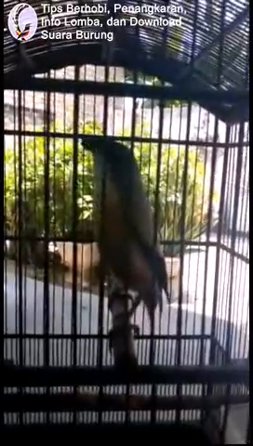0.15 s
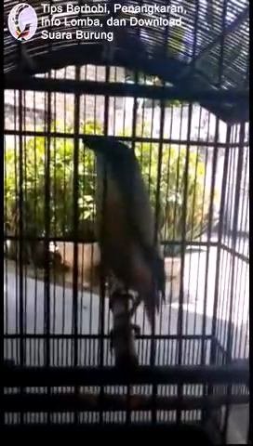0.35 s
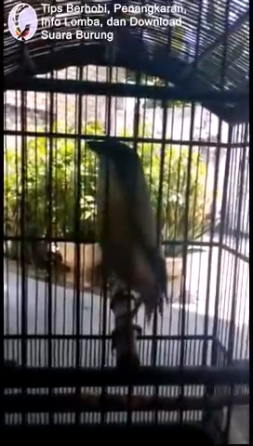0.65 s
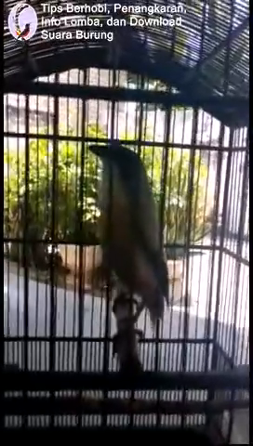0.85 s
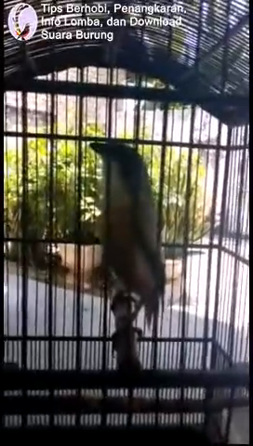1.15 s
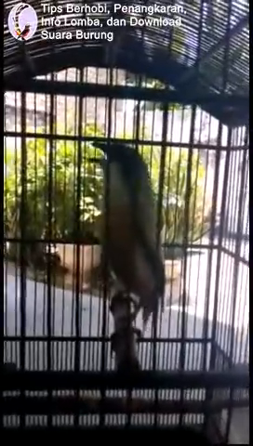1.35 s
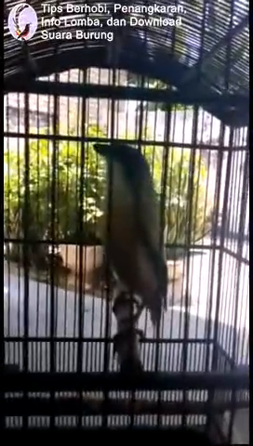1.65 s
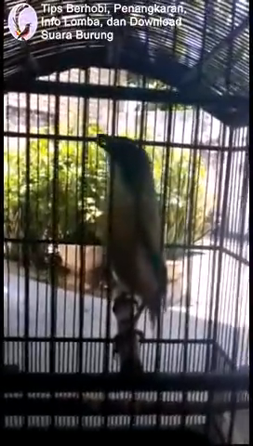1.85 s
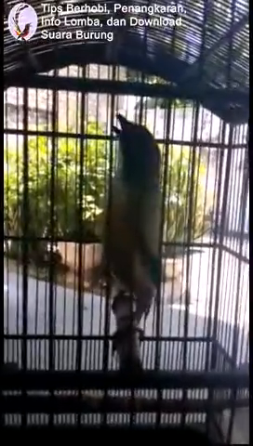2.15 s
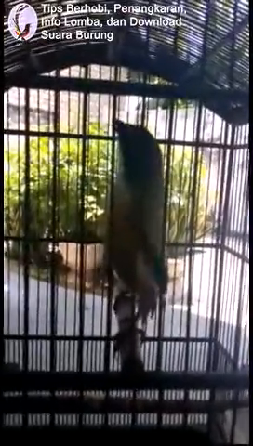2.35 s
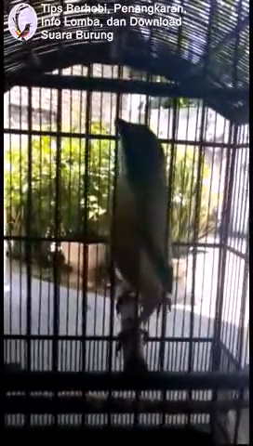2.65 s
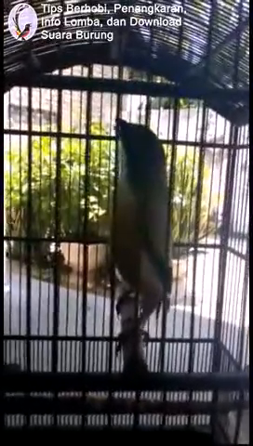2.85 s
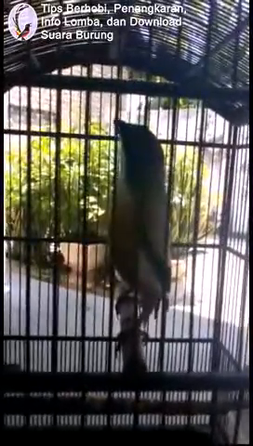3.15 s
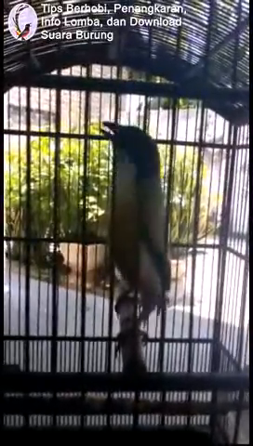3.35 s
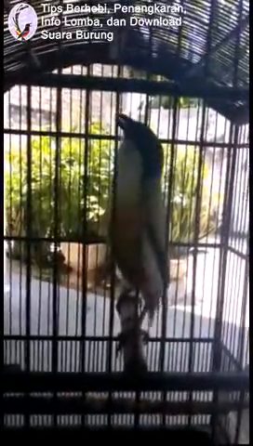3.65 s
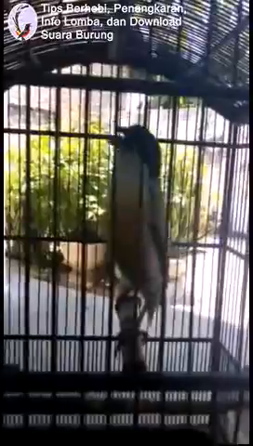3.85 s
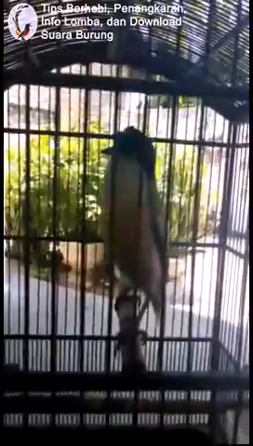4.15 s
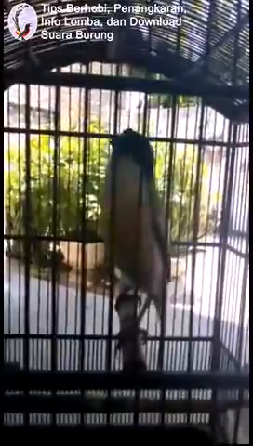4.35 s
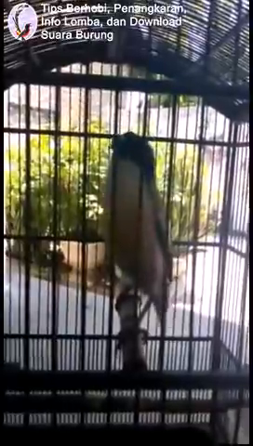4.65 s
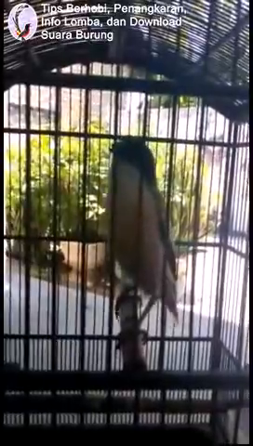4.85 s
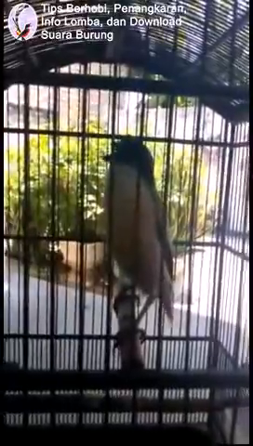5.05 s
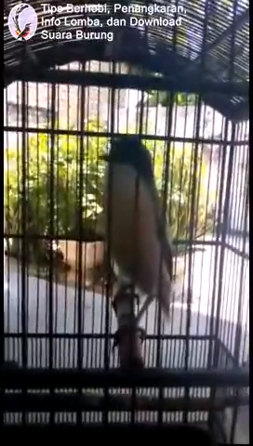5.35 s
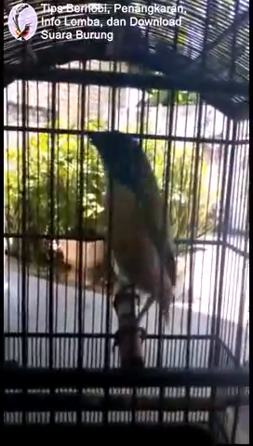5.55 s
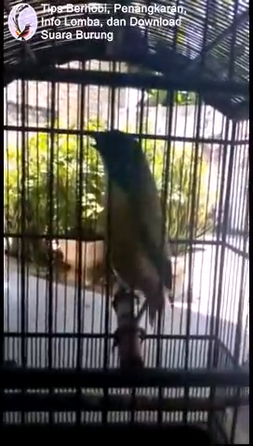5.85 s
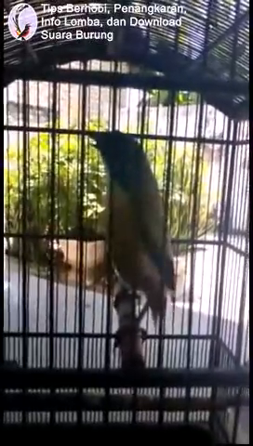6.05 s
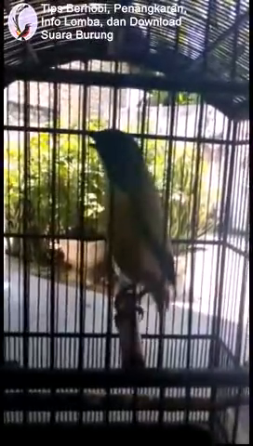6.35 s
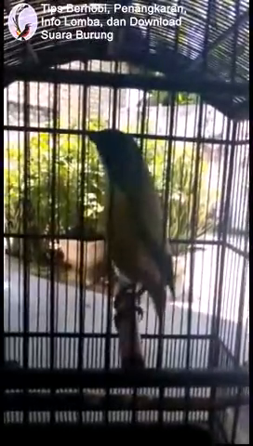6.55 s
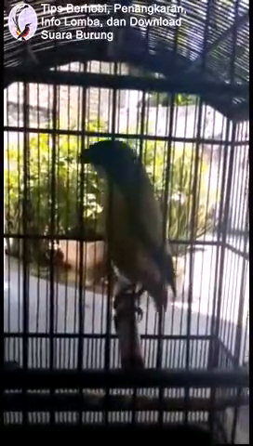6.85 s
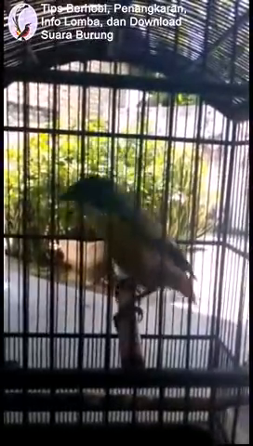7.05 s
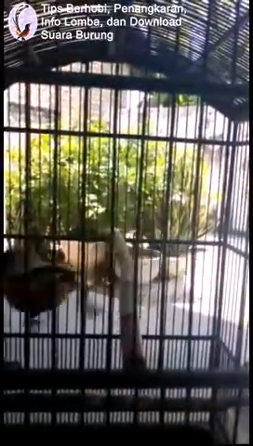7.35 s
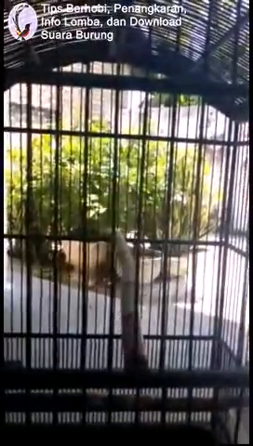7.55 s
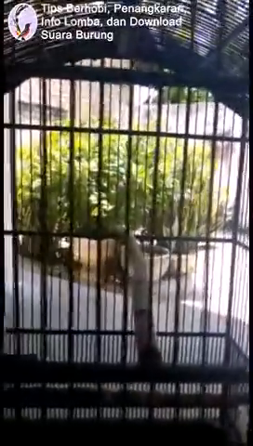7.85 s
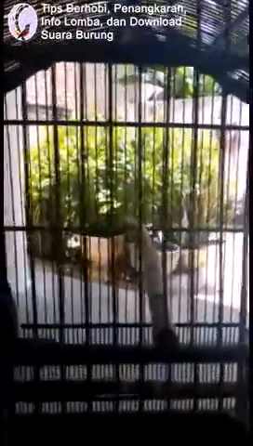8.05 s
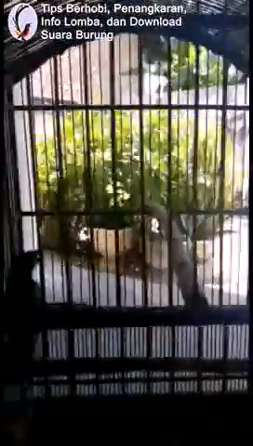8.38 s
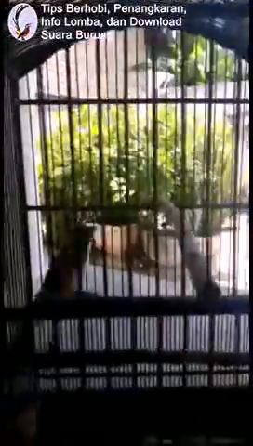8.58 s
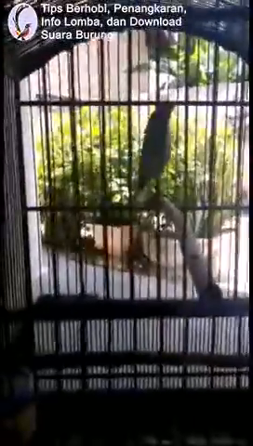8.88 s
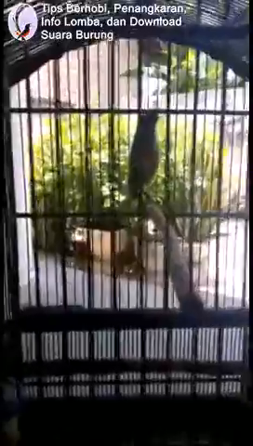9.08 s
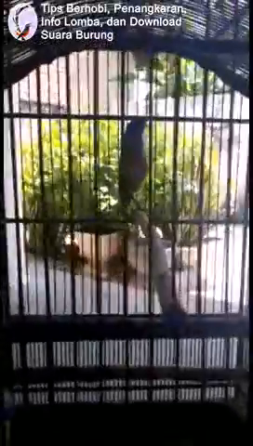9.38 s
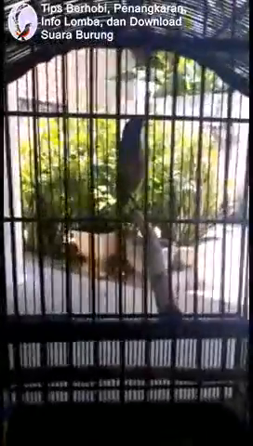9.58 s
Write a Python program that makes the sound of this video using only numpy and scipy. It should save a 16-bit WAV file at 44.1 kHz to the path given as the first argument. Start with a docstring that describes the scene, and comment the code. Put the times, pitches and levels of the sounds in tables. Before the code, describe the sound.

A single caged bird sings close to the microphone on a porch. Four snappy tuks, three spaced rising mews, an accelerating-in-loudness run of tiny ticks, seven more tuks, then loud piercing chips in steady rhythm. A squeak leads into many quick upslurred wheeps that grow rougher; after a short pause comes a five-note nasal chatter. Short cage and wall echoes, very faint outdoor air and distant engines.

```python
"""Over faint outdoor noise and a brief falling tone, a shrike sings close by in a cage on a porch: sharp tuks,
then rising mews, a run of ticks, more tuks, piercing chips, a squeak, upslurred wheeps and at last a chatter.
Each syllable is one gesture of the voice organ (syrinx): a gliding tone with harmonics, roughened by noise
and filtered by throat and beak. Notes of a kind differ a little; cage and walls answer with short echoes.
Outside there are filtered noise for air and far engines, a hum of steady tones, and soft gliding tones."""
import sys
import numpy as np
from scipy import signal
from scipy.fft import rfft, irfft, next_fast_len
from scipy.io import wavfile
from scipy.ndimage import uniform_filter1d, map_coordinates

SR = 44100
rng = np.random.default_rng(int(sys.argv[2]) if len(sys.argv) > 2 else 0)


def wav_out(sig):
    """Save sig, one row per channel (or a flat mono array), as 16-bit PCM at SR to the path in sys.argv[1]."""
    wavfile.write(sys.argv[1], SR, np.round(np.clip(np.atleast_2d(sig).T, -1, 1) * 32767).astype(np.int16))


N = 428652

# throat and beak filter of several kinds of note; wheeps shift it: (frequency [Hz], gain [dB])
WIDE_BEAK = [(900, -32), (2100, -13.5), (2600, -17), (4300, -1), (5300, -4), (6200, -1.5), (7100, -14),
             (8200, -26.5), (10500, -24.5), (13300, -32.5), (15500, -45)]


def from_db(db):
    """Turn decibels into a gain."""
    return 10 ** (np.asarray(db) / 20)


def rms_one(x):
    """Scale to unit power."""
    return x / np.sqrt(np.mean(x ** 2) + 1e-20)


def at_hz(points, hz):
    """Read a curve of (frequency, value) points on a log-frequency axis."""
    f, value = np.transpose(points)
    return np.interp(np.log(np.maximum(hz, 1)), np.log(f), value)


def along(rows, where):
    """Read every column of a table at the wanted places of its first column."""
    key, *columns = np.transpose(rows)
    return [np.interp(where, key, c) for c in columns]


def through(x, spectrum):
    """Filter a sound by a spectrum of gains in dB."""
    size = 2 * next_fast_len(len(x))
    gain = from_db(at_hz(spectrum, np.fft.rfftfreq(size, 1 / SR)))
    return irfft(rfft(x, size) * gain, size)[:len(x)]


def coloured(spectrum, size):
    """Noise of unit power with the given spectrum."""
    return rms_one(through(rng.standard_normal(size), spectrum))


def wobble(hz, size):
    """Random motion, mostly slower than hz, of about unit power."""
    lowpass = signal.butter(2, hz, fs=SR, output="sos")
    motion = rms_one(signal.sosfilt(lowpass, rng.standard_normal(2 * size)))
    return motion[size:]  # skip the filter's start


def shares(length):
    """Progress through a note of the given length in seconds, from 0 to 1."""
    return np.linspace(0, 1, int(length * SR))


def bump(u, at, width):
    """A passing movement: 1 at its middle, 0 far from it."""
    return np.exp(-((u - at) / width) ** 2)


def switch(u, at, width):
    """A lasting movement from 0 to 1."""
    return .5 + .5 * np.tanh((u - at) / width)


def glide(first, last, share):
    """Go from one value to another."""
    return first + (last - first) * share


def swell(u, rise_db, full_at, release_share, fall_db):
    """Attack, hold and release of a note, in dB; a negative fall makes the end grow."""
    attack = rise_db * np.maximum(1 - u / full_at, 0)
    release = fall_db * np.maximum(1 - (1 - u) / release_share, 0)
    return -attack - release


def stereo_noise(spectrum, side_db):
    """Noise shared by both ears, plus a part that is opposite in the two."""
    shared = coloured(spectrum, N)
    return shared + from_db(side_db) * coloured(spectrum, N) * np.array([[1], [-1]])


def outdoor_air(air_db=-66):
    """Outdoor air: a steady, wide noise."""
    # colour of the air noise: (frequency [Hz], relative level [dB per Hz])
    air_colour = [(25, -10), (150, 1.5), (420, -7), (750, -5), (1200, -14.5), (15000, -28.5)]
    return from_db(air_db) * stereo_noise(air_colour, side_db=-1.5)


def engine_drone(t):
    """Far engines: low noise with a peak near 150 Hz that swells and sinks."""
    # level of the drone: (time [s], level [dB])
    drone_levels = [(0, -59), (2.2, -64.5), (3.8, -71.5), (4.7, -70.5), (5.05, -55), (5.7, -64),
                    (6.15, -54.5), (6.7, -68), (7.5, -54.5), (8.7, -72.5)]
    level_db, = along(drone_levels, t)
    spectrum = [(50, -20.5), (125, -8), (153, 8), (195, -6), (1200, -45.5)]
    return from_db(level_db) * stereo_noise(spectrum, side_db=-18.0)


def engine_murmur(t, murmur_db=-1):
    """The murmur above the drone: noise strongest near 220 Hz, with a changing level."""
    # level of the murmur, before murmur_db is added: (time [s], level [dB])
    murmur_levels = [(0.0, -62.5), (2.38, -58), (2.68, -63), (8.25, -72.5), (9.72, -80)]
    level_db, = along(murmur_levels, t)
    spectrum = [(100, -19), (220, 0), (340, -4), (500, -14), (2000, -31), (8000, -53)]
    return from_db(murmur_db + level_db) * stereo_noise(spectrum, side_db=-10)


def faint_hum(hum_waver=.004):
    """A faint hum: sine tones of constant level whose pitch wavers slightly."""
    # tones of the hum: (average frequency [Hz], level [dB])
    hum_tones = [(384, -69), (671, -75.5), (720, -76)]
    out = 0
    for hz, db in hum_tones:
        phase = 2 * np.pi * hz * np.cumsum(1 + hum_waver * wobble(12, N)) / SR
        out = out + from_db(db) * np.sqrt(2) * np.sin(phase)
    return out


def soft_tones(t, overtone_db=-5, waver=0.042):
    """Soft tones with one overtone: a brief falling one at the start, then faint, wavering far calls."""
    # one row per tone, the level being the peak of its fundamental:
    # (time [s], length [s], first pitch [Hz], last pitch [Hz], level [dB])
    tones = [(0, 0.07, 1190, 1014, -49.5), (0.552, 1.25, 997, 883, -64.5), (1.46, 1.17, 1167, 1034, -73),
             (2.28, 0.19, 1003, 990, -63), (7.45, .7, 1062, 1333, -60), (7.98, .45, 584, 586, -65.5),
             (8.74, 0.22, 1262, 1310, -68)]
    out = 0
    for s, length, first_hz, last_hz, level_db in tones:
        share = np.clip((t - s) / length, 0, 1)
        pitch = glide(first_hz, last_hz, share) * (1 + waver * wobble(60, N))
        phase = 2 * np.pi * np.cumsum(pitch) / SR
        arch = 4 * share * (1 - share)
        out = out + from_db(level_db) * arch * (np.sin(phase) + from_db(overtone_db) * np.sin(2 * phase))
    return out


def neighbourhood(t):
    """Everything in the background, added up: air, far engines, hum and soft tones."""
    return outdoor_air() + engine_drone(t) + engine_murmur(t) + faint_hum() + soft_tones(t)


def syllable(beak, note_db, pitch, level_db, odd_db, rasp, hiss_db, halves=0, jitter=0.1, flutter=0.12,
             waver=0.0064, balance_db=3, air_db=-29):
    """One note: the harmonics of the syrinx glide through the resonances of throat and beak."""
    size = len(pitch)
    pitch = pitch * (1 + waver * wobble(110, size))
    odd_db = odd_db + balance_db * wobble(90, size)  # no two notes have quite the same colour
    # in rasping stretches the membranes vibrate unevenly
    uneven = 1 + jitter * (rasp + 0.041) * wobble(630, size)
    phase = 2 * np.pi * np.cumsum(pitch * uneven) / SR
    k = np.arange(1, 23)[:, None] / 2
    # odd harmonics follow odd_db; period doubling puts lines halfway between the harmonics
    strength = np.where(k % 1 > 0, halves, np.where(k % 2 == 1, from_db(odd_db), 1))
    strength = strength * (k * pitch < SR * .4)  # leave out tones that are too high
    tone = through((strength * np.sin(k * phase)).sum(0), beak)
    tone = tone / np.sqrt(uniform_filter1d(tone ** 2, size=64) + 1e-12)  # even out the loudness
    # turbulence: part rings in the throat, part leaves the beak as bright air
    hiss = from_db(hiss_db) * rasp * coloured(beak, size)
    air_colour = [(2000, -32.5), (4000, 4.5), (13500, -3.5), (16000, -16)]
    air = from_db(air_db) * np.sqrt(np.abs(rasp)) * coloured(air_colour, size)
    voice = tone * (1 + flutter * rasp * wobble(330, size)) + hiss + air
    shaped = voice * from_db(level_db) * signal.windows.tukey(size, .06)
    return from_db(note_db) * rms_one(shaped)


def tuk(whistle_hz, note_db, length_s=.029, start_hz=3850, low_hz=2650, snap_at=.4, catch_db=10):
    """A downward scoop catches, rasps and snaps up to a clean, level whistle."""
    # throat and beak held narrow: (frequency [Hz], gain [dB])
    narrow_beak = [(1800, -48), (2700, -1), (3900, -4.5), (5300, -7.5), (6500, -16.5), (8000, -27.5),
                   (12500, -45.5), (15000, -60.5)]
    u = shares(length_s)
    catch = bump(u, at=0.33, width=0.13)
    scoop = glide(start_hz, low_hz, u / snap_at)
    pitch = glide(scoop, whistle_hz, switch(u, snap_at, width=0.056))
    level_db = swell(u, rise_db=19.5, full_at=.15, release_share=0.33, fall_db=13) - catch_db * catch
    rasp = glide(.08, 0.9, catch)
    return syllable(narrow_beak, note_db, pitch, level_db, odd_db=10, rasp=rasp, hiss_db=-4.0)


def mew(length, note_db, doubling, start_hz=1690, top_hz=2700, climb_share=.42, odd_db=7):
    """A long rise that flattens out, may split roughly in mid-note and frays at the end."""
    u = shares(length)
    pitch = glide(top_hz, start_hz, np.exp(-u / climb_share))
    level_db = swell(u, rise_db=11.5, full_at=0.63, release_share=0.44, fall_db=5.5)
    split = doubling * bump(u, at=0.41, width=0.25)
    rasp = glide(0.036, 0.5, switch(u, at=0.82, width=.08)) + .25 * split
    # odd harmonics come forward early and step back later
    balance = odd_db * (bump(u, at=0.22, width=0.057) - bump(u, at=0.6, width=0.22))
    return syllable(WIDE_BEAK, note_db, pitch, level_db, balance, rasp, hiss_db=-17, halves=split)


def tick(pitch_hz, note_db, length_s=.008, start_ratio=0.778, clean_hz=5700, rasp_span_hz=1700, odd_db=5):
    """A rough click that clears into a very short pip; the lower it is, the rougher it stays."""
    u = shares(length_s)
    clear = switch(u, at=.2, width=0.14)
    pitch = pitch_hz * glide(start_ratio, 0.99, clear)
    level_db = swell(u, rise_db=19.5, full_at=.33, release_share=0.24, fall_db=21)
    lasting_rasp = 0.051 + ((clean_hz - pitch_hz) / rasp_span_hz) ** 2
    rasp = glide(0.51, lasting_rasp, clear)
    return syllable(WIDE_BEAK, note_db, pitch, level_db, odd_db, rasp, hiss_db=-13.5, air_db=-26)


def chip(length, note_db, start_hz=3100, whistle_hz=2620, creep_hz=150, land_hz=3530, overshoot_hz=750,
         crack_db=-20, odd_db=-16):
    """The octave settles into a piercing, growing whistle, cracks upward and lands on a weaker tone."""
    # throat and beak in the chips: (frequency [Hz], gain [dB])
    chip_beak = [(1900, -51), (2700, -11.5), (4200, -3), (5300, 1), (6300, -7.5), (8000, -12.5),
                 (10700, -27.5), (13300, -19), (16000, -32.5)]
    u = shares(length)
    entry, crack = bump(u, at=0, width=0.23), switch(u, at=.785, width=0.033)
    whistle = glide(whistle_hz + creep_hz * u ** 2, start_hz, entry)
    pitch = glide(whistle, land_hz, crack) + overshoot_hz * bump(u, at=.84, width=0.044)
    level_db = swell(u, rise_db=16, full_at=0.54, release_share=0.051, fall_db=-6)
    level_db = level_db + (crack_db - note_db) * crack  # the crack is about equally loud in every chip
    rasp = 0.058 + 0.77 * bump(u, at=.84, width=.07)
    # even harmonics carry the whistle, an octave above the fundamental; odd ones lead at both ends
    balance = glide(glide(odd_db, 10, entry), 6, crack)
    return syllable(chip_beak, note_db, pitch, level_db, balance, rasp, hiss_db=-6, air_db=-14.5,
                    waver=.008, balance_db=6)


def squeak(length, note_db, start_hz=2220, top_hz=3500, bend=2.8, land_hz=2200):
    """A split, shrill note that curls upward and collapses in a rasp."""
    u = shares(length)
    collapse, split = switch(u, at=.85, width=0.065), bump(u, at=0.35, width=0.16)
    pitch = glide(glide(start_hz, top_hz, u ** bend), land_hz, collapse)
    level_db = swell(u, rise_db=13, full_at=0.24, release_share=0.26, fall_db=16)
    rasp = 0.065 + 0.31 * split + 1.3 * collapse
    return syllable(WIDE_BEAK, note_db, pitch, level_db, odd_db=-5, rasp=rasp, hiss_db=-6.5,
                    halves=0.49 * split, air_db=-22.5)


def wheep(length, shoulder_hz, note_db, held_back, crack, start_hz=1370, flick_hz=3150, shoulder_at=.66,
          crack_db=1, doubling=0.22, catch_db=8, least_gape=0.9, gape_gain=0.32):
    """A climb to a shoulder and a flick; held back, it swells sooner, gapes wider and catches up late."""
    u = shares(length)
    delay = held_back * (1 - switch(u, at=.67, width=0.0925))
    climb = np.minimum(u / shoulder_at, 1) * (1 - delay)
    flick, strain = switch(u, at=.87, width=0.033), bump(u, at=0.592, width=.11)
    pitch = glide(glide(start_hz, shoulder_hz, climb), flick_hz, flick)
    level_db = swell(u, rise_db=16.5, full_at=0.58 * (1 - held_back), release_share=0.19, fall_db=6.5)
    level_db = level_db - crack_db * crack * strain
    level_db = level_db - catch_db * bump(u, at=0.854, width=0.029)  # the voice catches at the jump to the flick
    # the third harmonic leads at first, the second on the shoulder;
    # in the flick the fundamental comes out unless the climb was held back
    odd_db = 11 * bump(u, at=0, width=0.16) - 10 * bump(u, at=0.74, width=0.12)
    odd_db = odd_db + (14 - 25 * held_back) * bump(u, at=0.99, width=0.11)
    rasp = 0.087 + glide(0.14, 0.87, crack) * strain + 0.34 * flick
    gape = least_gape + gape_gain * held_back
    beak = [(hz * gape, db) for hz, db in WIDE_BEAK]  # a wider gape raises the resonances
    return syllable(beak, note_db, pitch, level_db, odd_db, rasp, hiss_db=-6.5,
                    halves=doubling * crack * strain, waver=0.0099, balance_db=5.5, air_db=-17)


def chatter(length, top_hz, note_db, scoop=0.16, fall=0.344, odd_db=-7):
    """A nasal arch: the even harmonics ring on top; it is harsh where it rises and where it falls away."""
    # throat and beak in the chatter: (frequency [Hz], gain [dB])
    chatter_beak = [(1000, -28), (2300, -19.5), (3150, 0), (3800, -3), (4600, -7), (6500, -18.5),
                    (8000, -25), (15000, -32.5)]
    u = shares(length)
    entry, drop = bump(u, at=0, width=0.25), switch(u, at=.9, width=0.084)
    pitch = top_hz * (1 - scoop * entry - fall * drop)
    level_db = swell(u, rise_db=13.5, full_at=0.37, release_share=0.21, fall_db=3.5)
    balance = glide(odd_db, 6.5, entry + drop)
    rasp = 0.13 + .5 * entry + 0.82 * drop
    return syllable(chatter_beak, note_db, pitch, level_db, balance, rasp, hiss_db=-3, jitter=0.059)


def phrase(notes, voice):
    """Sing one kind of note at each row's time."""
    out = np.zeros(N + SR)
    for s, *row in notes:
        note, start = voice(*row), int(s * SR)
        out[start:start + len(note)] += note
    return out[:N]


def song():
    """The whole song as it leaves the beak, one phrase for each kind of note."""
    # tuks: (time [s], whistle pitch [Hz], level [dB])
    tuk_notes = [(0.036, 4027, -15.5), (0.138, 3993, -16), (0.262, 4080, -16.5), (0.374, 4065, -16.5),
                 (2.591, 4120, -15.5), (2.693, 4066, -15), (2.8, 4050, -14.5), (2.909, 4024, -15.5),
                 (3.013, 4030, -15), (3.119, 4043, -14.5), (3.239, 4174, -15.5)]
    # mews: (time [s], length [s], level [dB], period doubling [0-1])
    mew_notes = [(0.794, 0.098, -20, 0), (1.198, 0.093, -21, 0.42), (1.611, 0.098, -21.5, 0.39)]
    # a run of ticks, mostly falling and growing: (time [s], pitch [Hz], level [dB])
    tick_notes = [(1.995, 5420, -39.5), (2.052, 5570, -38.5), (2.112, 5640, -43), (2.174, 5150, -29.5),
                  (2.238, 5040, -26), (2.306, 4880, -24.5), (2.372, 4640, -25), (2.438, 4300, -27),
                  (2.508, 4210, -23)]
    # chips: (time [s], length [s], level [dB])
    chip_notes = [(3.359, 0.027, -18.5), (3.485, 0.025, -14), (3.611, 0.033, -14), (3.739, 0.03, -11),
                  (3.869, 0.029, -12.5), (4.007, .03, -11), (4.147, 0.03, -11.5), (4.294, 0.025, -9.5),
                  (4.434, .03, -11.5), (4.575, .03, -12), (4.7366, .029, -12), (4.8966, .028, -11),
                  (5.043, 0.025, -9.5), (5.179, 0.03, -12), (5.326, 0.027, -11), (5.471, 0.03, -12.5)]
    # the squeak that opens the wheeps: (time [s], length [s], level [dB])
    squeak_notes = [(5.612, 0.06, -13.5)]
    # wheeps: (time [s], length [s], shoulder pitch [Hz], level [dB],
    # share of the climb held back [0-1], crack [0-1])
    wheep_notes = [(5.742, 0.053, 2487, -16, 0.01, 0), (5.871, 0.048, 2386, -16.5, 0, 0.02),
                   (5.989, .053, 2260, -19, 0, 0.03), (6.107, 0.052, 2335, -18, 0, 0),
                   (6.228, 0.052, 2344, -18.5, 0, 0.27), (6.349, 0.048, 2294, -19, 0.01, 0.1),
                   (6.473, .048, 2325, -18.5, 0, 0.02), (6.604, 0.054, 2350, -20, 0.02, 0.28),
                   (6.743, 0.057, 2420, -18, 0.14, 0), (6.888, 0.061, 2506, -17.5, 0.18, 0),
                   (7.029, 0.059, 2450, -18.5, 0.25, 0), (7.173, 0.063, 2565, -19.5, 0.31, 0.04),
                   (7.321, 0.061, 2606, -20.5, 0.47, 0.8), (7.468, .061, 2520, -21.5, 0.5, 0.9),
                   (7.61, .062, 2567, -21, 0.31, 0.25), (7.762, .064, 2576, -25, 0.39, 0.95),
                   (7.907, .06, 2425, -19, 0.33, 0), (8.054, 0.064, 2370, -20.5, 0.43, 0.93),
                   (8.199, 0.062, 2450, -21.5, 0.43, 1), (8.349, 0.064, 2425, -20.5, .3, 0.2),
                   (8.496, 0.066, 2466, -21.5, 0.48, 1), (8.639, 0.068, 2392, -23.5, 0.43, 1)]
    # chatter: (time [s], length [s], top pitch [Hz], level [dB])
    chatter_notes = [(9.322, .046, 1750, -23), (9.393, 0.047, 1684, -20), (9.472, .052, 1586, -21.5),
                     (9.548, .05, 1568, -20.5), (9.629, 0.05, 1568, -20)]
    opening = phrase(tuk_notes, tuk) + phrase(mew_notes, mew) + phrase(tick_notes, tick)
    middle = phrase(chip_notes, chip) + phrase(squeak_notes, squeak)
    return opening + middle + phrase(wheep_notes, wheep) + phrase(chatter_notes, chatter)


def cage_echoes(t, cage_t60=0.11):
    """Bars and cage roof scatter the song at once: sparse random clicks that die away."""
    shape = (2, len(t))
    clicks = rng.standard_normal(shape) * (rng.random(shape) < 2500 / SR)  # about 2500 a second
    return clicks * from_db(-60 * t / cage_t60) * (t > .001)


def wall_tail(t, build_s=0.0029):
    """The walls' tail: bands of noise that build up and die away, the treble first."""
    # time the tail takes to fall by 60 dB: (frequency [Hz], fall time [s])
    porch_t60 = [(1500, 0.28), (4000, 0.26), (7000, 0.25), (14000, 0.21)]
    edges = np.geomspace(700, 17000, 8)
    tail = 0
    for low, high in zip(edges, edges[1:]):
        bandpass = signal.butter(2, [low, high], "band", fs=SR, output="sos")
        band = signal.sosfilt(bandpass, rng.standard_normal((2, len(t))))
        tail = tail + band * from_db(-60 * t / at_hz(porch_t60, np.sqrt(low * high)))
    return tail * (1 - np.exp(-t / build_s))


def porch(x, cage_db=-14, tail_db=-13):
    """Each moment of the song sets off the echoes of cage and walls (a convolution)."""
    t = np.arange(int(.6 * SR)) / SR
    tail = from_db(tail_db) * rms_one(wall_tail(t))
    cage = from_db(cage_db) * rms_one(cage_echoes(t))
    response = (cage + tail) / np.sqrt(len(t))
    return signal.fftconvolve(x, response, axes=1)[:, :N]


def scene():
    """The song reaches the left ear slightly late; echoes and background surround it."""
    # the bird's place, changing as it hops off the perch and away:
    # (time [s], delay of the left ear [ms], left minus right [dB], song level into the echoes [dB])
    place = [(0, .15, -4, 3.5), (3.2, 0.16, -5, 2), (3.9, 0.17, -3.5, -2), (7.2, 0.15, -4, 3),
             (7.5, 0.023, -0.5, 4.5), (8.7, 0.013, -2.5, 5.5), (9.3, 0.15, -3, 7)]
    t = np.arange(N) / SR
    late_ms, pan_db, echo_db = along(place, t)
    bird = song() * from_db([pan_db / 2, -pan_db / 2])
    left, right = bird
    late_left = map_coordinates(left, [np.arange(N) - late_ms * SR / 1000], order=3)
    return np.array([late_left, right]) + porch(bird * from_db(echo_db)) + neighbourhood(t)


def record(dry):
    """The loudest peaks are rounded, and the top is cut steeply."""
    rounded = dry / (1 + (dry / .9) ** 8) ** (1 / 8)
    cutoff_hz = 15600
    lowpass = signal.ellip(10, .2, 80, cutoff_hz, fs=SR, output="sos")
    return signal.sosfilt(lowpass, rounded)


dry = scene()
out = record(dry)
wav_out(out)
```